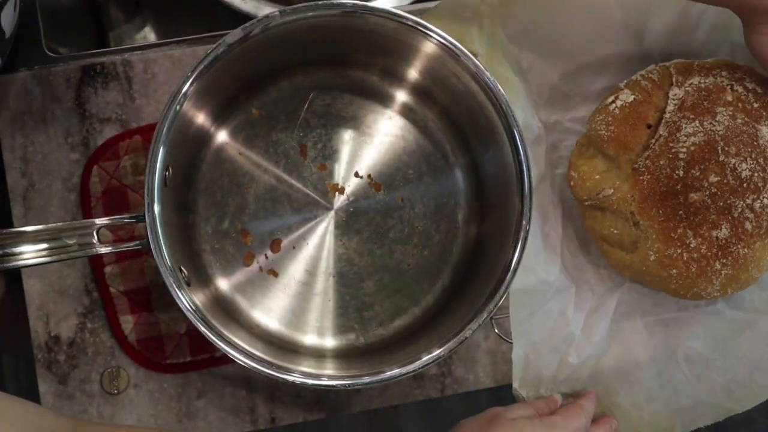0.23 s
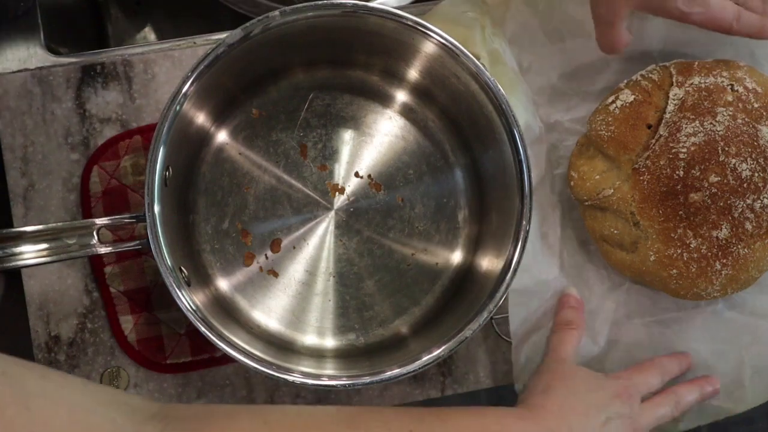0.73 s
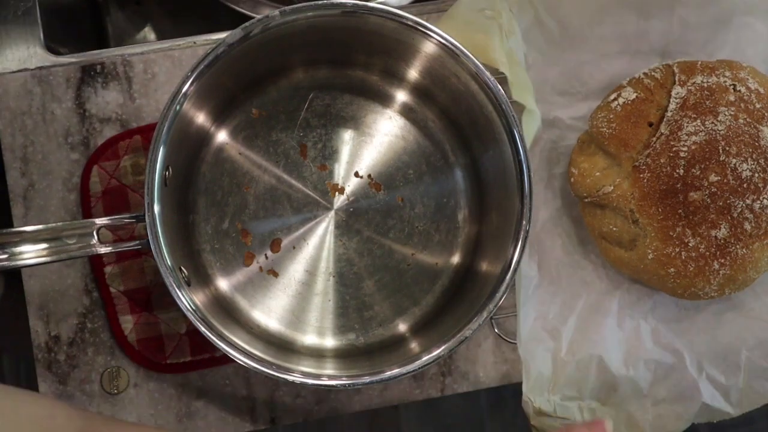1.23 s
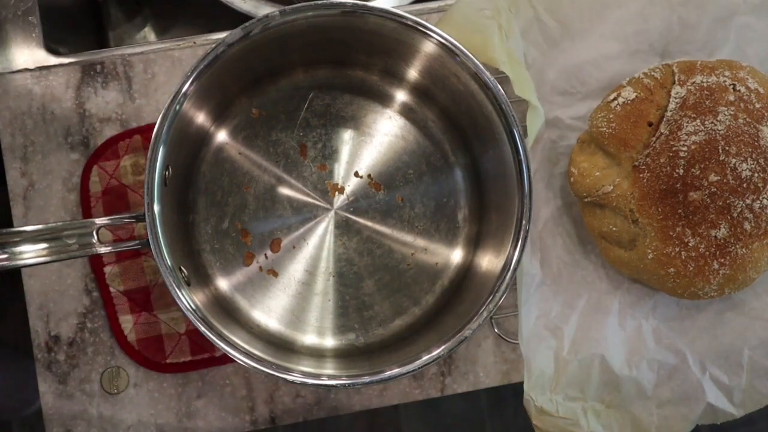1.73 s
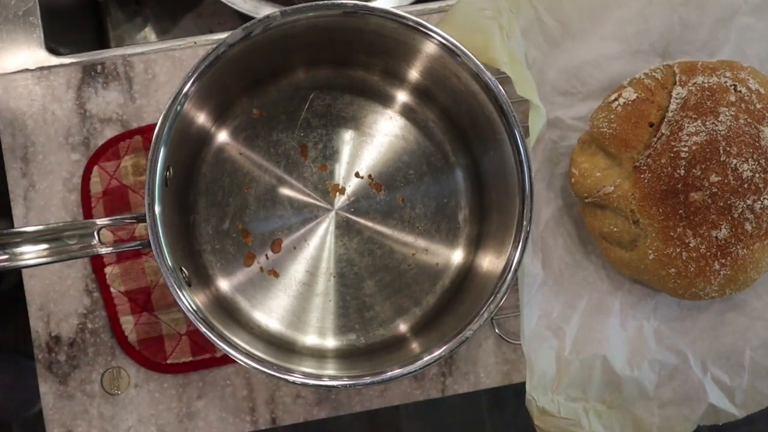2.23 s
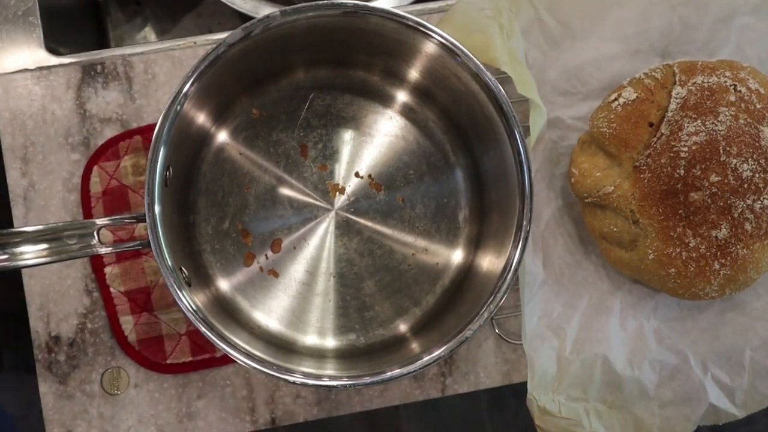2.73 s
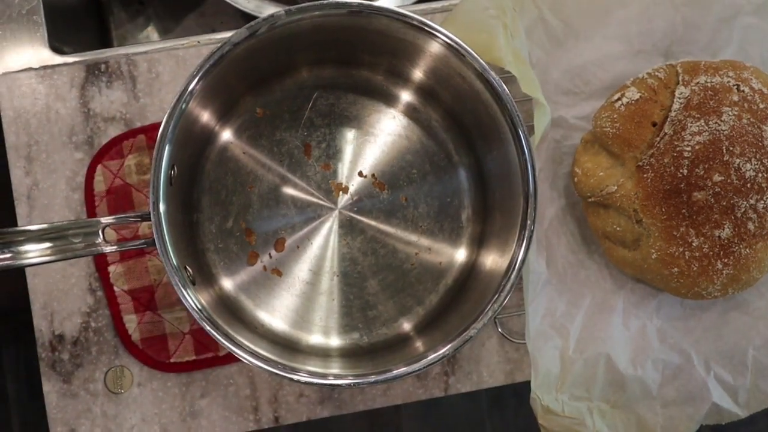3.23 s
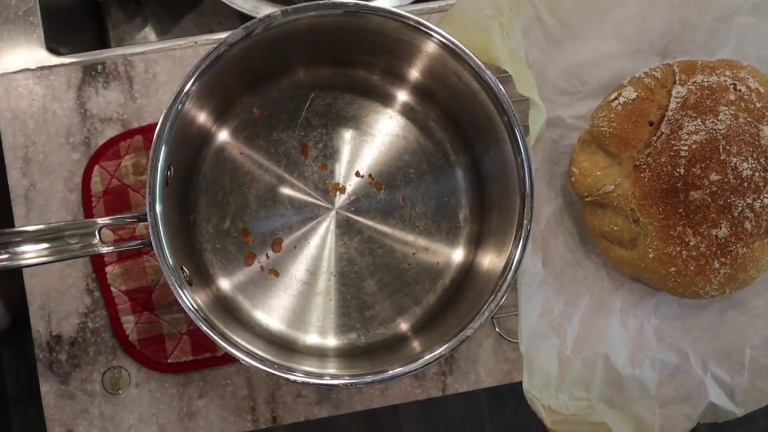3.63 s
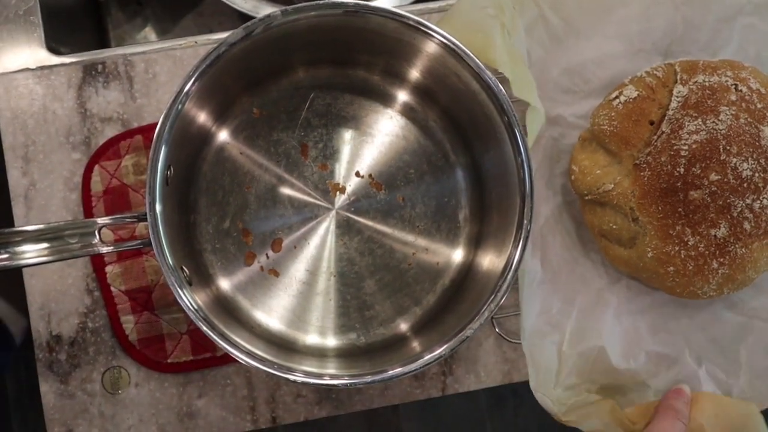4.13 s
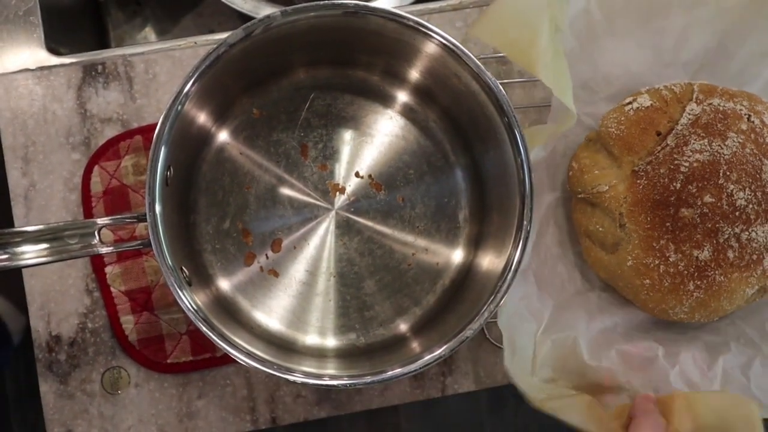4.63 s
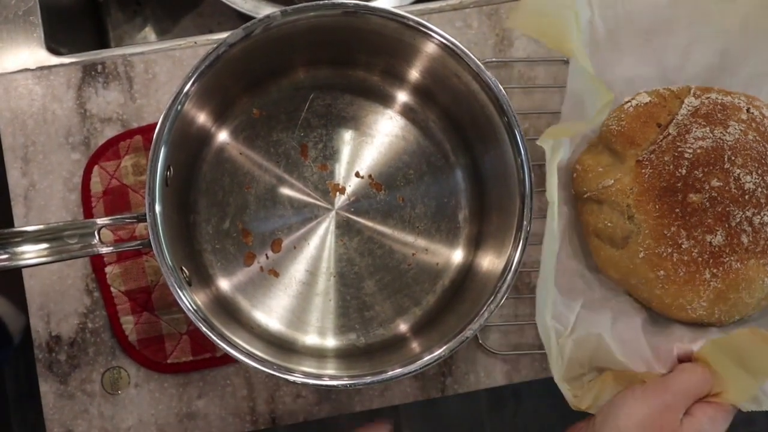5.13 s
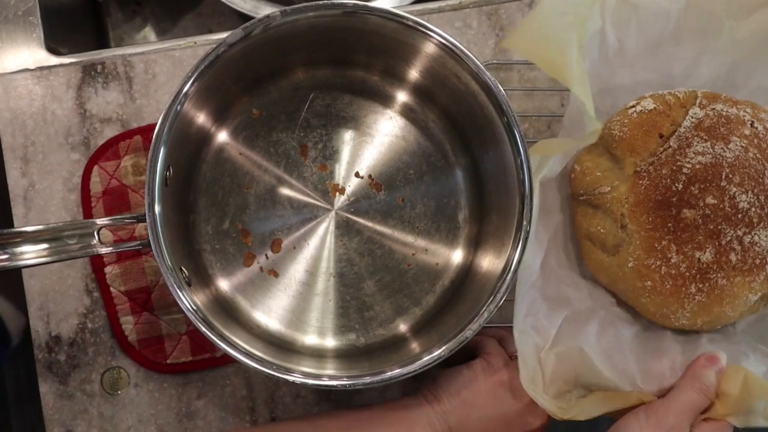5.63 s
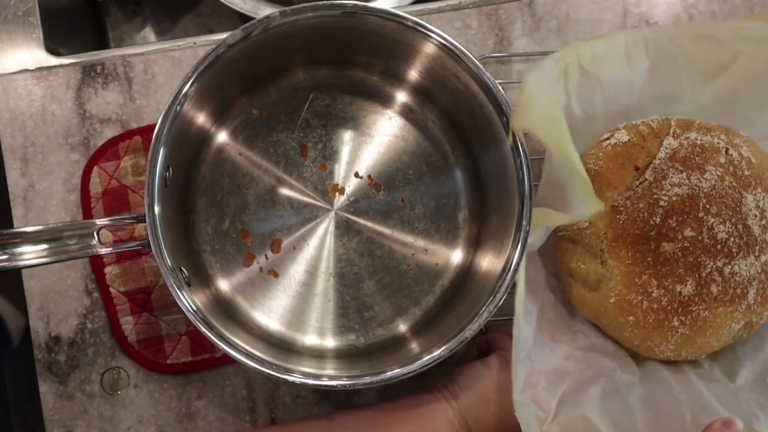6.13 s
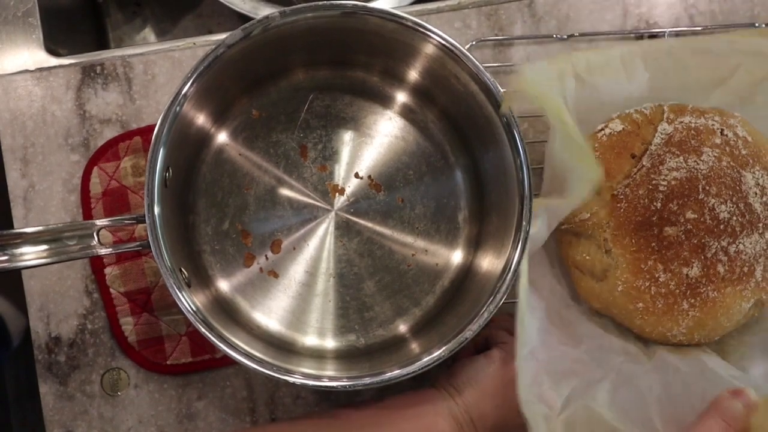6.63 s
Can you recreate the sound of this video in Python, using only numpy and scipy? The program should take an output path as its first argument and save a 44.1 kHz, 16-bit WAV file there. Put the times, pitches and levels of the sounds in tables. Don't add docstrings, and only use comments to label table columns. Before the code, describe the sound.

Two hands handle a crisp sheet near a small stereo camera microphone. Hundreds of tiny dry creases mix with louder individual snaps, answered by a short room echo. The middle is nearly still, leaving low electrical hum and soft air noise that rise with automatic gain, then drop when vigorous crinkling resumes.

```python
import sys
import numpy as np
from scipy import signal
from scipy.fft import rfft, irfft, next_fast_len
from scipy.io import wavfile
from scipy.ndimage import uniform_filter1d

SR = 44100
rng = np.random.default_rng(int(sys.argv[2]) if len(sys.argv) > 2 else 0)


def int16_out(signal):
    q = np.round(np.clip(np.atleast_2d(signal).T, -1, 1) * 32767)
    wavfile.write(sys.argv[1], SR, q.astype(np.int16))


def ratio(d):
    e = np.asarray(d, float) / 20
    return 10 ** e


N = 303849


def set_level(x, db):
    return x * ratio(db) / np.sqrt(np.mean(x ** 2))


def curves(table):
    start_s, *columns = np.transpose(table)
    time_s = np.arange(N) / SR
    return [np.interp(time_s, start_s, column) for column in columns]


def colour(x, points):
    size = next_fast_len(N)
    freq_hz, gain_db = np.transpose(points)
    bin_hz = np.arange(size // 2 + 1) * SR / size
    gain = ratio(np.interp(np.log(bin_hz + 1), np.log(freq_hz), gain_db))
    return irfft(rfft(x, size) * gain, size)[..., :N]


def turn_phase(x, radians):
    size = next_fast_len(N)
    return irfft(rfft(x, size) * np.exp(1j * radians), size)[..., :N]


def walk(rate_hz):
    hold = int(SR / rate_hz)
    steps = np.repeat(rng.standard_normal(N // hold + 1), hold)
    return uniform_filter1d(steps, hold)[:N]


# start_s, pitch_hz, level_db
FRIDGE_HUM = [(0.0, 116, -27.5), (0.11, 119.3, -33.5), (0.67, 119.2, -34), (0.71, 119.4, -31.5),
              (1.11, 119.3, -34), (2.19, 119.4, -28.5), (2.22, 119.5, -26.5), (2.28, 119.3, -29.5),
              (2.47, 119, -26), (2.59, 119.6, -27), (2.63, 119.3, -25.5), (2.68, 119.4, -25.5),
              (3.68, 119.3, -24), (4.01, 119.3, -24.5), (4.05, 119.3, -33), (4.07, 118.9, -29.5),
              (4.22, 119.4, -33), (4.28, 119.3, -28.5), (4.43, 119.3, -31.5), (4.47, 119.6, -35.5),
              (4.64, 119.1, -32), (4.72, 119.3, -36), (4.78, 119.6, -31.5), (4.81, 119.6, -40),
              (4.83, 119.2, -35.5), (5.16, 118.9, -36), (5.2, 119.7, -40), (5.24, 120.4, -35.5),
              (5.82, 120.3, -33), (5.83, 120.4, -38), (5.85, 120.4, -31.5), (6.5, 120.5, -33),
              (6.56, 120.4, -29), (6.6, 120.4, -32), (6.68, 120.3, -31), (6.7, 121, -33),
              (6.77, 120.6, -33), (6.89, 121.5, -30)]
# multiple of the hum pitch, level_db against the hum
FRIDGE_OVERTONES = [(2, -16.5), (3, -26.5), (4, -27.5)]
# freq_hz, level_db per Hz
AIR_SUM_COLOUR = [(20, -7), (35, -8), (55, -6.5), (90, -2), (150, -3.5), (240, -8), (500, -18), (800, -20),
                  (1200, -25.5), (2500, -33.5), (5000, -43), (10000, -59), (12500, -60), (16000, -80)]
# freq_hz, level_db per Hz
AIR_DIFFERENCE_COLOUR = [(24, -65), (40, -32), (115, -5), (312, -17), (354, -13), (873, -16.5), (1210, -13),
                         (1630, -18), (4800, -25), (10200, -42), (16000, -62)]


def kitchen():
    pitch_hz, gain_db = curves(FRIDGE_HUM)
    phase = 2 * np.pi * np.cumsum(pitch_hz) / SR
    hum = np.sin(phase)
    for multiple, level_db in FRIDGE_OVERTONES:
        hum = hum + ratio(level_db + 3.2 * walk(5)) * np.sin(multiple * phase)

    whine_hz, whine_db = 4780, -44
    whine = ratio(whine_db + 1.5 * walk(6)) * np.sin(2 * np.pi * whine_hz * np.arange(N) / SR)
    air_sum = set_level(colour(rng.standard_normal(N), AIR_SUM_COLOUR), -7.5)
    air_difference = set_level(colour(rng.standard_normal(N), AIR_DIFFERENCE_COLOUR), -18)

    port_sum = np.sqrt(2) * hum + air_sum + 0.3 * whine
    port_difference = air_difference + whine - ratio(-34) * hum
    return ratio(gain_db) * np.array([port_sum, port_difference])


BANDS_HZ = 400 * 2 ** np.arange(0, 5.1, .625)


def bursts(seconds, band_db, decay_s):
    out = np.zeros((2, N))
    at = np.clip((seconds * SR).astype(int), 0, N - 1)
    for k, hz in enumerate(BANDS_HZ):
        keep = np.exp(-1 / (SR * decay_s * (1 + 900 / hz)))
        strikes = np.bincount(at, ratio(band_db[:, k]), N)
        envelope = signal.lfilter([np.sqrt(1 - keep ** 2)], [1, -keep], strikes)
        band = signal.butter(2, [hz / 1.24, hz * 1.24], "band", fs=SR, output="sos")
        out += signal.sosfilt(band, envelope * rng.standard_normal((2, N)))
    return out


def tint(peak_hz, peak_db, dull_db):
    octaves_off = np.log2(BANDS_HZ / peak_hz[:, None])
    hump = peak_db * np.exp(-octaves_off ** 2 / 0.36)
    return hump + dull_db[:, None] * (BANDS_HZ < 1300)


# start_s, rustle level_db, dull flap level_db against the rustle
HANDLING_MOVES = [(0.0, -21, -9.5), (0.04, -19, -11.5), (0.09, -20.5, -9.5), (0.29, -18.5, -16),
                  (0.33, -36, -10), (0.44, -33, -10), (0.46, -27, -14.5), (0.59, -24.5, -14),
                  (0.67, -48, 2), (0.69, -32.5, -16), (0.77, -32.5, -13), (0.88, -16.5, -13),
                  (1.0, -20.5, -13), (1.04, -16, -11), (1.09, -25, -11), (1.21, -30, -18), (1.25, -23, -18),
                  (1.27, -35, -7), (1.46, -48, -9), (1.52, -64, 12), (1.61, -51, -7), (1.65, -60.5, 11.5),
                  (1.9, -67, 13), (2.01, -56, 7), (2.07, -65, 17), (2.15, -48.5, -2), (2.26, -54, 6),
                  (2.28, -43, 1), (2.3, -41, -1), (2.49, -59, 8), (2.76, -59, 9), (2.82, -44, 0),
                  (2.92, -62, 10), (3.4, -60, 12), (3.45, -38.5, -2), (3.55, -51.5, -3), (3.67, -37, -6.5),
                  (3.84, -42.5, -2), (3.86, -39, -10), (3.89, -25, -9), (3.93, -33.5, -7),
                  (4.01, -26.5, -8.5), (4.2, -18, -16), (4.24, -24, -11), (4.3, -24, -10),
                  (4.32, -24.5, -7.5), (4.43, -24, -15.5), (4.47, -35, -4), (4.51, -19.5, -12.5),
                  (4.61, -32, -10), (4.64, -17.5, -11), (4.78, -20.5, -13.5), (4.91, -27.5, -16.5),
                  (4.93, -15.5, -14), (4.97, -21.5, -10.5), (5.03, -18, -12.5), (5.1, -41, -12),
                  (5.12, -28.5, -6.5), (5.24, -42.5, -4.5), (5.47, -28.5, -14), (5.51, -38, -9),
                  (5.56, -31, -10), (5.6, -43, -9), (5.62, -32, -14), (5.72, -34.5, -5.5), (5.89, -20, -9),
                  (5.93, -36, -9), (5.97, -19, -8), (6.06, -30.5, -10), (6.12, -20, -12.5),
                  (6.14, -29, -7.5), (6.89, -22.5, -10.5)]


def crackle():
    rustle_db, flap_db = curves(HANDLING_MOVES)
    when, size, pitch = rng.random((4200, 3)).T
    at = (when * N).astype(int)
    size_db = rustle_db[at] - 3.506 * np.log(1 - size) + 10
    peak_hz = 1200 * 9 ** pitch
    band_db = size_db[:, None] + tint(peak_hz, 7.74, flap_db[at] + 13.5)
    return bursts(when * N / SR, band_db, decay_s=0.00071)


# start_s, peak level_db, loudest pitch_hz, dull part level_db against the peak
SINGLE_SNAPS = [(0.0168, -16, 3750, -26), (0.0618, -8, 4540, -23), (0.1253, -6.5, 2270, -23),
                (0.3446, -12, 9530, -25), (0.365, -14.5, 3060, -12), (0.4, -14, 2220, -26),
                (0.4512, -14, 2630, -23), (0.4675, -20, 1890, -29), (0.482, -11, 2830, -26),
                (0.637, -21, 4300, -12), (0.6789, -30, 2080, -20), (0.6953, -21, 4120, -25),
                (0.749, -19, 2520, -21), (0.7547, -21, 2590, -21), (0.778, -14, 3930, -28),
                (0.82, -15, 2790, -23), (0.829, -13, 1940, -19), (0.854, -9, 4580, -24),
                (0.876, -6, 3640, -26), (1.0036, -16, 3970, -24), (1.0265, -1.5, 3330, -26),
                (1.1295, -13, 2550, -20), (1.2134, -12, 3092, -31), (1.2421, -10, 3670, -27),
                (1.2847, -13, 2960, -18), (1.3246, -15.5, 4270, -22), (1.3412, -14, 1940, -27),
                (1.414, -28, 2950, -28), (1.4403, -16.5, 1600, -29), (1.567, -31, 1360, -13),
                (1.5967, -35, 1200, -22), (1.597, -18, 2760, -29), (1.6771, -36, 1350, -8),
                (1.7537, -30, 1236, -9), (1.8228, -47, 1570, 2), (1.9615, -29, 1316, -13),
                (2.0153, -25, 3360, -14), (2.1122, -28, 1910, -18), (2.135, -20.5, 2260, -21),
                (2.2797, -16.5, 2780, -17), (2.6179, -35, 1280, -2), (2.806, -4, 4090, -28),
                (3.1697, -42, 1537, 1), (3.4091, -32, 1742, -2), (3.436, -23, 2204, -12),
                (3.5823, -37, 1258, -5), (3.6469, -23.5, 7110, -10), (3.6977, -19, 2580, -9),
                (3.7855, -25, 1520, -13), (3.8093, -17.5, 2200, -13), (3.8566, -9.5, 3700, -26),
                (3.8883, -4, 3680, -24), (3.9659, -23, 1197, -11), (3.9659, -8, 3055, -13),
                (4.0068, -26, 1200, -14), (4.0069, -3, 10500, -29), (4.0276, -6, 4146, -29),
                (4.038, -3, 10400, -30), (4.0665, -1, 10190, -24), (4.1235, -7, 2800, -30),
                (4.1997, -10, 6180, -25), (4.2802, -3, 3140, -25), (4.2896, -9, 3350, -27),
                (4.35, -4.5, 3920, -26), (4.3867, -7.5, 1530, -20), (4.4202, -2.5, 7850, -29),
                (4.4487, -8.5, 2990, -17), (4.4847, -9, 3100, -24), (4.5, -4.5, 2820, -16),
                (4.575, -13, 9720, -21), (4.6294, -12, 9410, -27), (4.6351, -5.5, 3070, -21),
                (4.6828, -6.5, 9800, -24), (4.7183, -5.5, 5010, -21), (4.7647, -11, 3810, -24),
                (4.786, -4, 3230, -11), (4.8444, -9, 5630, -29), (4.8613, -10.5, 2480, -26),
                (4.9251, -8, 3050, -24), (5.0125, -8, 4340, -25), (5.0704, -7.5, 5680, -24),
                (5.1123, -15, 4120, -23), (5.1316, -6, 4110, -30), (5.1609, -11, 4280, -30),
                (5.2682, -17, 2720, -11), (5.3097, -20, 3210, -23), (5.3368, -32, 2844, -15),
                (5.3654, -36, 4750, -20), (5.3842, -13, 3110, -33), (5.4128, -14, 4710, -29),
                (5.4342, -14, 2115, -15), (5.5256, -14.5, 9620, -23), (5.5523, -29, 2430, -16),
                (5.5524, -16.5, 3920, -16), (5.5608, -15, 4410, -28), (5.6171, -9.5, 3830, -28),
                (5.66, -18, 2540, -24), (5.6993, -9.5, 3020, -19), (5.7309, -12.5, 2890, -7),
                (5.7706, -10.5, 2733, -24), (5.8137, -28, 3470, -12), (5.814, -17, 2870, -18),
                (5.8322, -7.5, 1290, -23), (5.9394, -18, 2310, -16), (5.9538, -6, 2750, -15),
                (5.9917, -6.5, 3490, -12), (6.0252, -20, 4350, -26), (6.045, -15, 2470, -23),
                (6.0854, -11, 2820, -18), (6.1878, -10.5, 2240, -20), (6.2362, -12, 4640, -21),
                (6.2602, -9, 4650, -20), (6.297, -10.5, 4540, -26), (6.3295, -18, 4640, -18),
                (6.3923, -17, 3360, -25), (6.4796, -15, 4270, -22), (6.5502, -10.5, 1200, -22),
                (6.5505, -10, 1240, -17), (6.6717, -10, 2870, -20), (6.7568, -8, 5820, -17),
                (6.8274, -15, 2470, -19), (6.8619, -11.5, 2684, -24)]


def snaps():
    start_s, peak_db, pitch_hz, dull_db = np.transpose(SINGLE_SNAPS)
    band_db = peak_db[:, None] + 14.5 + tint(pitch_hz, 6.4, dull_db + 14.5)
    return bursts(start_s, band_db, decay_s=0.00093)


def room(x):
    t60_s, level_db, gap_s = 0.3, -2, 0.00154
    t = np.arange(int(0.5 * SR)) / SR
    noise = rng.standard_normal((2, len(t))) * (t > gap_s)
    low = signal.sosfilt(signal.butter(1, 3000, fs=SR, output="sos"), noise)
    high = noise - low
    tail = low * ratio(-60 * t / t60_s) + high * ratio(-60 * t / (0.8 * t60_s))
    tail = tail * ratio(level_db) / np.sqrt(np.sum(tail ** 2, axis=1, keepdims=True))
    return signal.fftconvolve(x[None], tail, axes=1)[:, :N]


# freq_hz, level_db per Hz
PAPER_SUM_COLOUR = [(150, -43), (250, -8), (273, -10), (408, -3.5), (512, -8.5), (1180, -3), (2430, -1.5),
                    (6680, -5.5), (9990, -5), (11300, -6), (16300, -46)]
# freq_hz, level_db per Hz
PAPER_DIFFERENCE_COLOUR = [(150, -59), (250, -29), (355, -24), (631, -22.5), (1180, -10), (2340, -6),
                           (4630, -3), (6920, -6.5), (10300, 0), (13900, -16.5), (16300, -41)]


def paper():
    near, other = crackle() + snaps()
    echo_sum, echo_difference = room(near)
    share = 0.75
    aside = turn_phase(near, -2.21) * share + other * np.sqrt(1 - share ** 2)
    port_sum = colour(near + echo_sum, PAPER_SUM_COLOUR)
    port_difference = ratio(2.5) * colour(aside + echo_difference, PAPER_DIFFERENCE_COLOUR)
    return np.array([port_sum, port_difference])


def scene():
    port_sum, port_difference = paper() + kitchen()
    return np.array([port_sum + port_difference, port_sum - port_difference])


def roll_off(x):
    return signal.sosfilt(signal.butter(12, 16460, fs=SR, output="sos"), x)


def record(dry):
    mix = np.clip(dry, -1, 1)
    return roll_off(mix)


dry = scene()
out = record(dry)
int16_out(out)
```